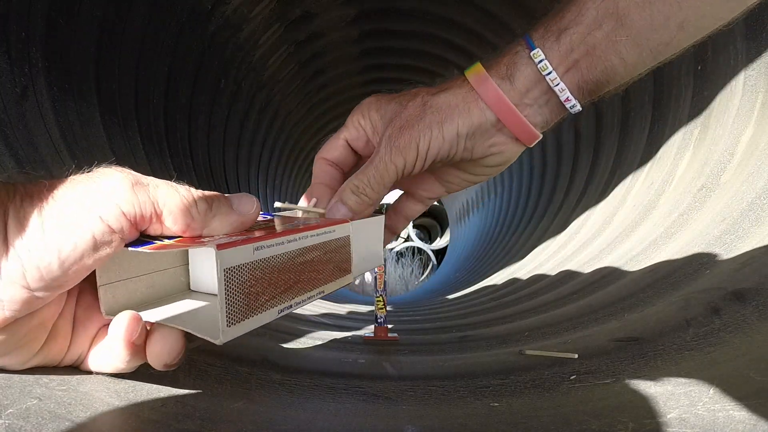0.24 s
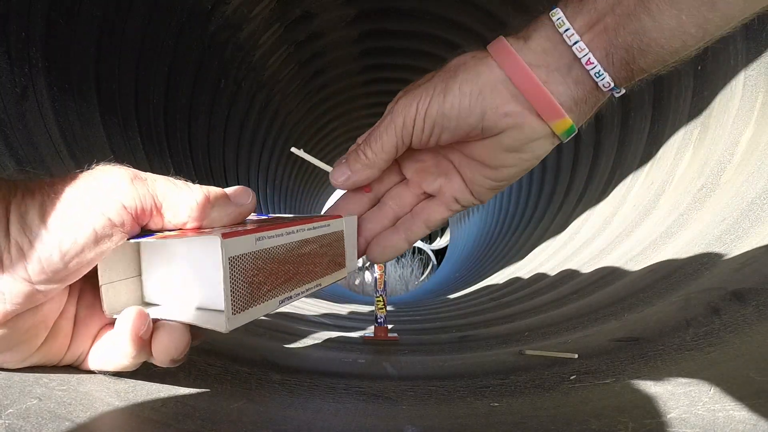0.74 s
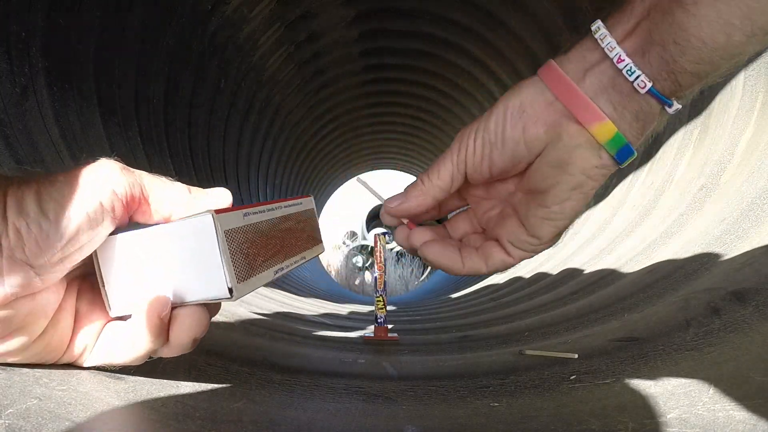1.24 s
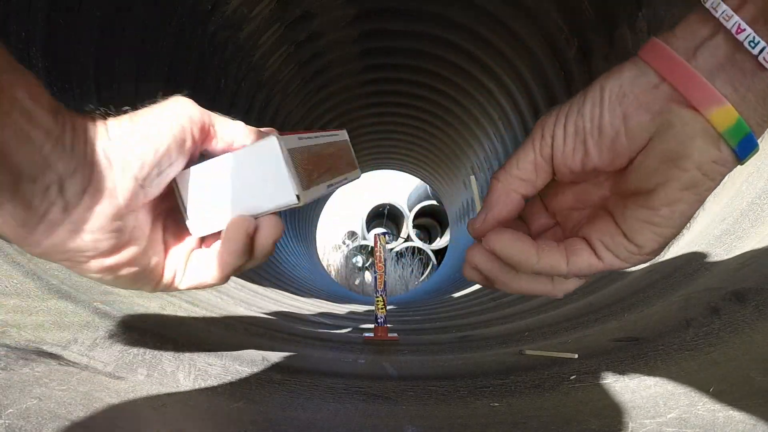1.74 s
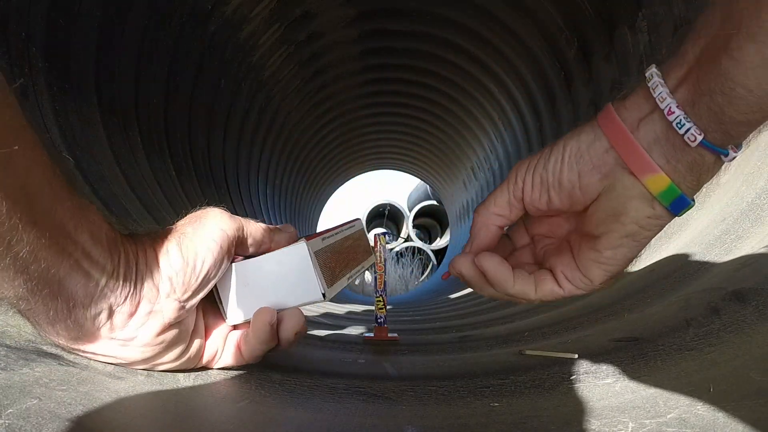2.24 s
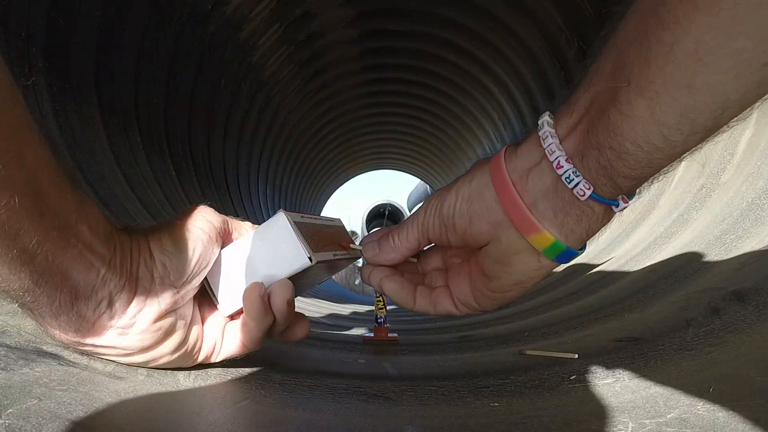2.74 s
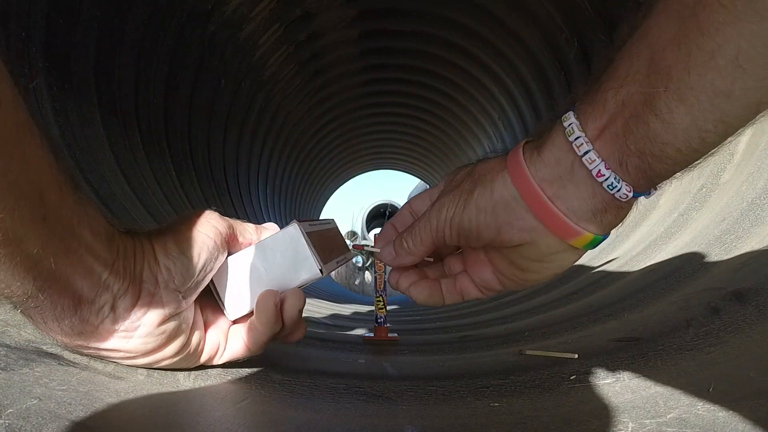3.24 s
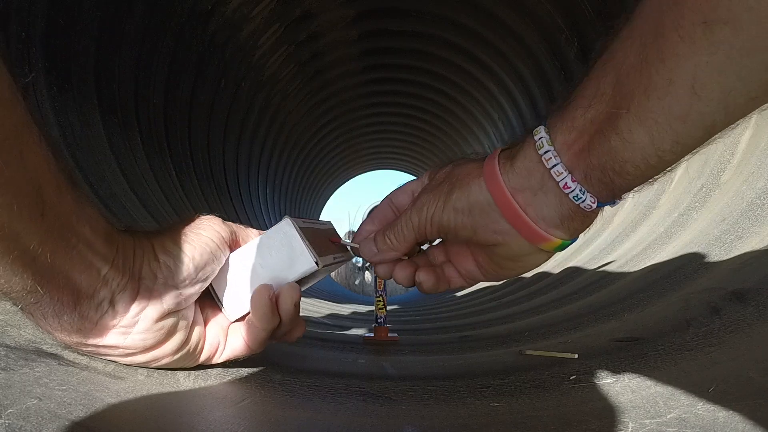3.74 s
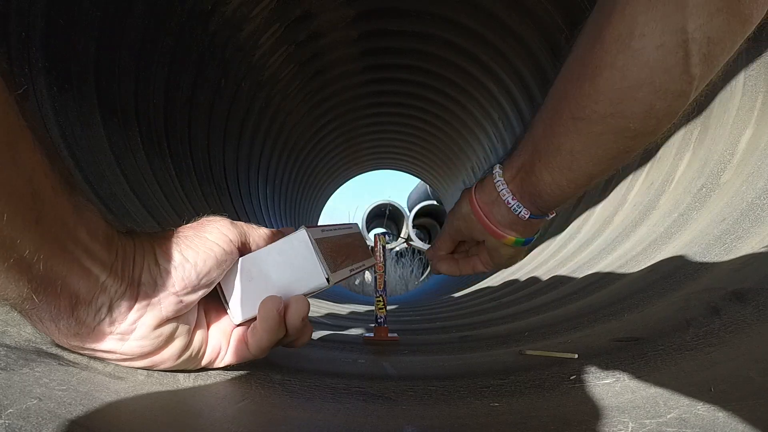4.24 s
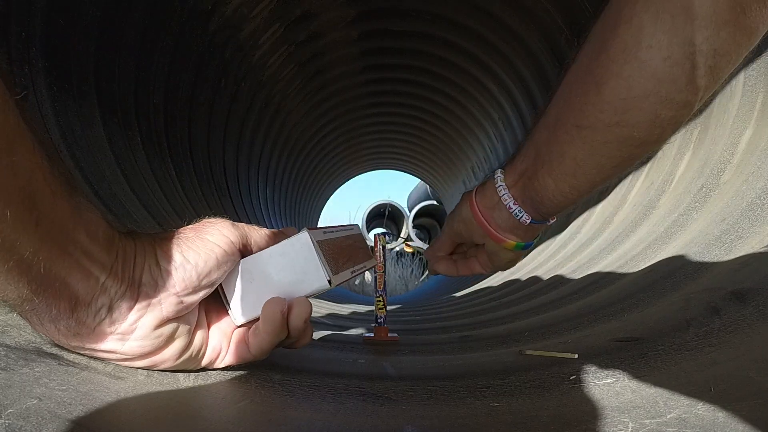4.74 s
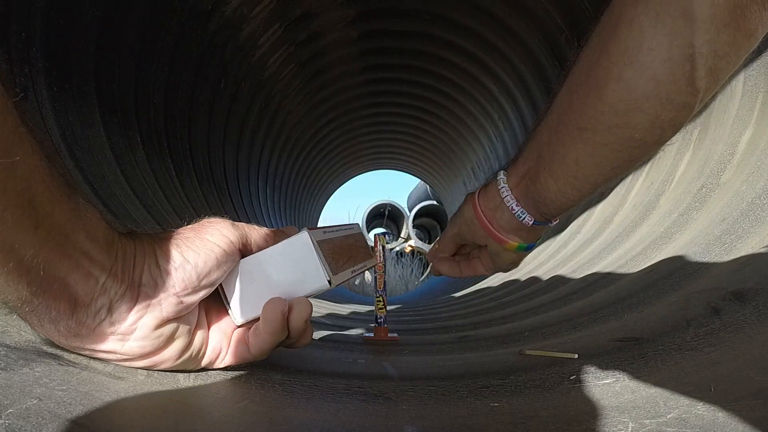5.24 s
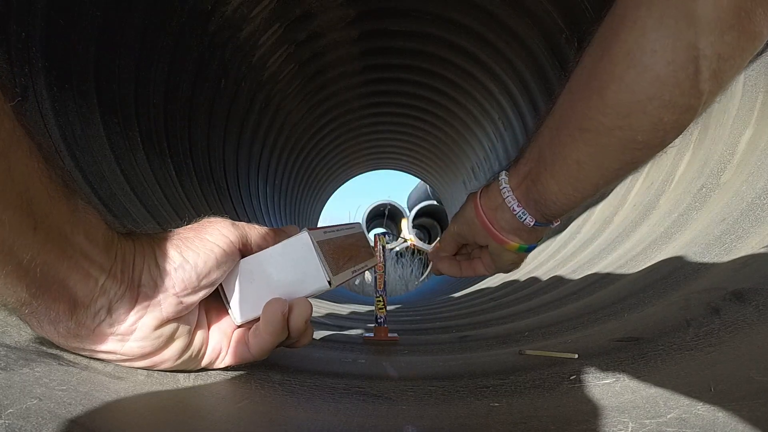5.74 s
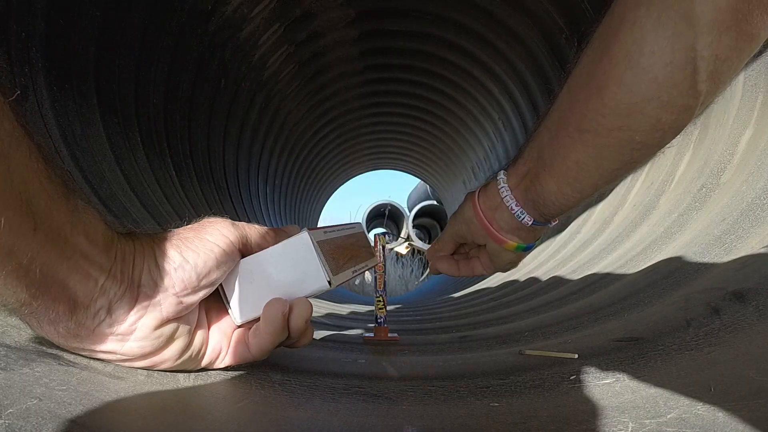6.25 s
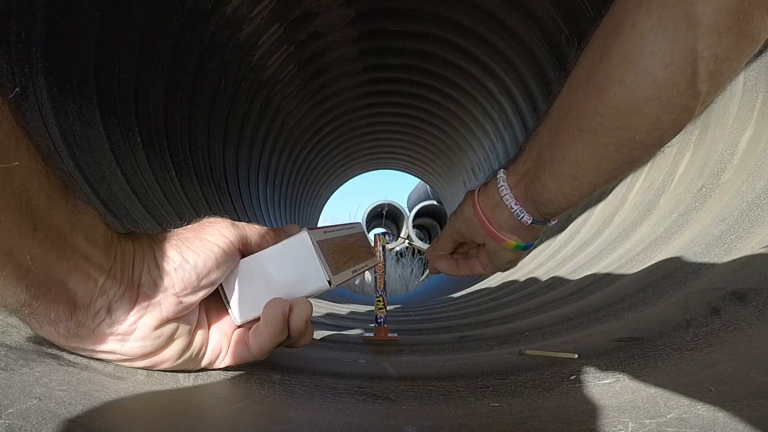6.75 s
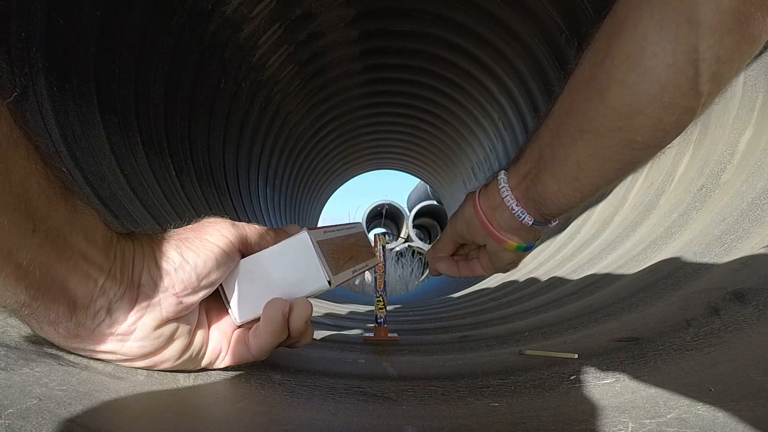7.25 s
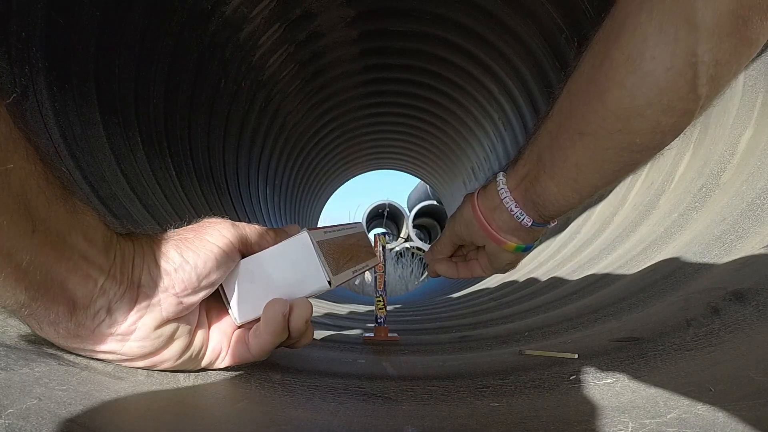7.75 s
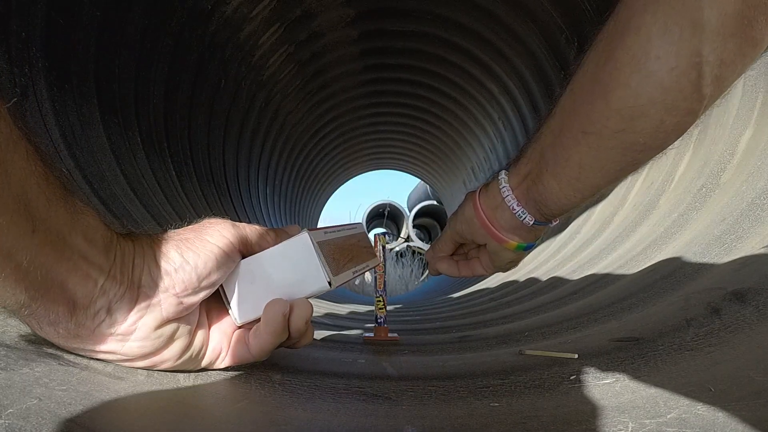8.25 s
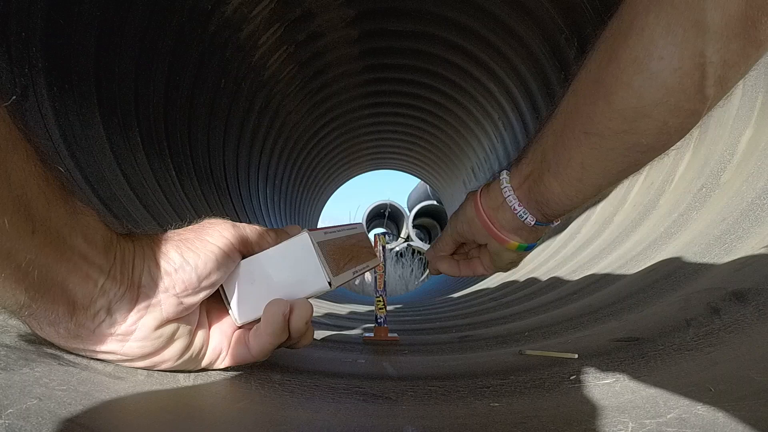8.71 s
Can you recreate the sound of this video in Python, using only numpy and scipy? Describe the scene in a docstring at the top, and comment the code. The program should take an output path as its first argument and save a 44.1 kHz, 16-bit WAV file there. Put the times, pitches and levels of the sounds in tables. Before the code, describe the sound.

A matchbox is handled and closed in an echoing plastic pipe, followed by a loud double thump and one short match scrape.

```python
"""Matches rattle softly in an open matchbox, handled inside a ribbed plastic drain pipe.
The tray rubs shut, then the arm holding the box thumps twice on the pipe wall: the wall shakes,
the air inside booms and the matches tumble. One match is scraped once over the striker and burns
with a faint hiss and flutter. The pipe echoes these small sounds and murmurs with outdoor air."""
import sys
import numpy as np
from scipy import signal
from scipy.fft import rfft, irfft, next_fast_len
from scipy.io import wavfile
from scipy.ndimage import map_coordinates

SR = 44100
rng = np.random.default_rng(int(sys.argv[2]) if len(sys.argv) > 2 else 0)


def generate_wav(signal):
    """Clip the signal to [-1, 1] and save it as 16-bit WAV at the path in sys.argv[1]."""
    frames = np.transpose(np.atleast_2d(signal))
    scaled = np.clip(frames, -1, 1) * 32767
    pcm = np.round(scaled).astype(np.int16)
    wavfile.write(sys.argv[1], SR, pcm)


N = 396018
TIME = np.arange(N) / SR
TRAY_HOME_S = 0.96  # from here on the box sounds shut
STRIKE_START_S, STRIKE_END_S = 3.988, 4.031  # the match head meets the striker and leaves it

# the box is tilted or jolted: (time [s], level [dB], rise [s], fall [s])
SHAKES = [(0.01, -53.5, 0.05, 0.26), (1.985, -57.5, 0.092, 0.05), (2.005, -40, 0.012, 0.14),
          (2.13, -39.5, 0.11, 0.048), (2.95, -63.5, 0.27, 0.3), (3.995, -51, 0.0056, 0.15),
          (4.084, -44, 0.034, 0.047), (4.175, -55.5, 0.073, 0.04)]
# a finger pushes the tray home in two goes: (time [s], length [s], level at full speed [dB])
TRAY_PUSHES = [(0.751, 0.17, -42.5), (0.993, 0.061, -44)]
# taps of wood and card, and one quick echo as the tray stops:
# (time [s], level [dB], brightness [dB], share of box ring [dB])
TAPS = [(0.181, -44, -23, -30), (0.4588, -25.5, -17, -11.5), (0.5268, -34, -24, -17),
        (0.9281, -32, -25, -9), (0.9376, -42, -26, -13), (1.043, -33, -19, -18), (1.0503, -30.5, -34, -20),
        (1.6542, -42.5, -34, -26), (1.839, -45.5, 10, -34), (2.0055, -30, -5.5, -6),
        (2.1006, -32.5, -8, -13), (2.2094, -39, -14, -8), (2.8624, -48, -23, -3), (3.0001, -44, -18, 0.5),
        (3.0165, -41.5, -21, -4), (3.0579, -50, -3, -14), (3.0962, -44.5, -20, -3), (4.106, -37, -11, -21),
        (4.1724, -41, -14, -1), (4.2906, -48.5, -20, -5)]
# sharp bursts of the scrape, the last a quick echo off the pipe wall: (time [s], level [dB])
SCRAPE_BURSTS = [(4.001, -36), (4.013, -35.5), (4.0275, -30), (4.039, -41)]
# the flame flares up: (time [s], level [dB])
FLARES = [(4.8, -75), (5.4, -69.5), (6.05, -75.5)]
# the arm lands on the pipe or jolts it: (time [s], wall level [dB], hardness [dB], boom level [dB])
THUMPS = [(1.579, -37.5, -7, -60), (1.8138, -7.5, 0, -44.5), (1.9936, -6, -3.5, -29.5),
          (2.245, -37, -13, -73), (4.002, -42, 6, -49.5)]
# the box knocks as the arm lands: (time [s], level [dB], contact time [s], ring of its side [dB])
KNOCKS = [(1.812, -28, 0.00081, 16.5), (1.9885, -21.5, 0.0011, 0), (1.9907, -21.5, 0.0014, 5)]
# puffs of breeze at the pipe's mouth: (time [s], level [dB])
GUSTS = [(0.3, -54), (1.65, -50.5), (2.7, -57), (4.5, -60), (6.55, -55), (8.1, -59.5)]

# The tone of each sound, from low to high pitch: (frequency [Hz], level [dB])
TUMBLE_TONE = [(500, -22), (700, -3.5), (950, -11.5), (1400, -3), (2400, 2), (3200, -7.5), (4300, -13.5),
               (5500, -6.5), (7000, -15), (9000, -29.5), (15000, -39)]  # sticks in the shut box
PICK_TONE = [(500, -21), (1000, -14), (1200, 2.5), (1650, -2), (1900, -9), (2300, -4), (4000, -15),
             (6000, -17), (15000, -42)]  # sticks in the open tray
SLIDE_TONE = [(200, -24), (300, -3), (500, -38), (900, -10), (1450, -4), (2000, -10.5), (2650, -12),
              (3200, -7.5), (4200, -16), (6000, -7), (8500, -17), (12000, -25), (15000, -26)]  # card rubbing on card
RASP_TONE = [(300, -25), (900, -18), (1550, 4.5), (2800, -4.5), (6500, 2), (9000, -11), (15000, -20.5)]
TAP_TONE = [(200, -20), (900, -11.5), (1250, -0.5), (2250, 1.5), (3400, -12.5), (4600, -2), (6000, -0.5),
            (8500, -19), (15000, -33.5)]
GRIT_TONE = [(100, -1), (230, 8), (480, -10), (720, 0.5), (1150, -5), (2000, -2), (3000, -2.5),
             (4200, -5.5), (5200, -2), (7500, -9.5), (10000, -13.5), (13000, -18), (15000, -26)]  # the rough striker
FIZZ_TONE = [(500, -20), (2500, 4), (5500, 4.5), (8000, -7.5), (15000, -27)]
FLUTTER_TONE = [(60, -16), (150, 3), (320, 2), (600, -15), (1500, -19), (6000, -45)]
WALL_TONE = [(40, -39.5), (100, -9), (140, -20), (165, 1.5), (215, 0.5), (245, -2.5), (280, 0.5),
             (350, -3.5), (400, -15), (480, -30.5), (560, -21), (730, -21), (820, -36.5), (1200, -49),
             (3000, -73)]
SHUDDER_TONE = [(15, -2.5), (30, 6.5), (50, 7), (70, -11), (98, -6), (130, -18), (220, -12), (330, -21),
                (500, -61.5)]  # the whole pipe shaking
KNOCK_TONE = [(200, -7), (650, -1), (1000, -9), (1500, 4.5), (1900, -1.5), (2600, -8), (3200, -38),
              (6000, -29), (15000, -55)]
AIR_TONE = [(11, -38), (18, -6.5), (37, -5.5), (54, -12), (76, -6.5), (129, -10), (171, -9), (309, -12.5),
            (387, -15), (827, -18.5), (1060, -20.5), (3100, -26.5), (9040, -39), (13400, -43.5),
            (15000, -50)]
BREEZE_TONE = [(10, -4.5), (30, 1), (60, -10), (150, -17), (400, -29.5), (1500, -66)]

# Rings are the pitches that a thing makes louder: (frequency [Hz], width [Hz], boost [dB])
OPEN_BOX_RINGS = [(1200, 100, -1), (1615, 280, 11.5), (2240, 150, 9), (3620, 350, 15.5), (5030, 180, 7),
                  (5970, 450, 5.5)]
SHUT_BOX_RINGS = [(1374, 140, 6.3), (1630, 130, 2.5), (1970, 61, 2), (2235, 100, 6.6), (2990, 140, 6.3),
                  (3660, 190, 13), (5060, 210, 9.7), (5810, 160, 4.4)]
MATCH_RING, FLAME_RING = (2900, 1100, 2.8), (2600, 1200, 4)
WALL_RINGS = [(168, 16, 0), (203, 7.1, 5.5), (276.6, 29, 3.5), (355.3, 5.9, 3), (413, 15, 7.5),
              (576, 16, 6), (710, 54, 6.5)]
PIPE_AIR_RINGS = [(360, 40, 12), (696, 44, 2.5)]  # air ringing across the pipe

# how long the pipe's echo takes to fade by 60 dB (a "t60"): (frequency [Hz], fade time [s])
PIPE_FADE = [(200, 0.73), (900, 1), (2200, 0.54), (5500, 0.26), (12000, 0.31)]


def match_rattle(settle_db=-23, settle_s=0.63):
    """Each shake makes the sticks rub, then settle: first in the open tray, later in the shut box."""
    stirring = together(swell(s, db, rise, fall) + swell(s, db + settle_db, rise, settle_s)
                        for s, db, rise, fall in SHAKES)
    slips = friction(per_second=870, spread_db=5, smooth=0.62)
    picked = unit(shape_tone(slips, PICK_TONE))
    tumbling = unit(shape_tone(slips, TUMBLE_TONE, SHUT_BOX_RINGS))
    return stirring * np.where(TIME < TRAY_HOME_S, picked, tumbling)


def tray_slide(rasp_db=-1, ring_share=0.76, speed_up_s=0.09, dull_hz=1900):
    """Card fibres catch as the tray slides: dull at first, hollow at speed, a thin rasp near home."""
    slips = friction(per_second=2500, spread_db=0, smooth=0.77)
    fast = unit(shape_tone(slips, SLIDE_TONE, OPEN_BOX_RINGS))
    slow = signal.sosfiltfilt(signal.butter(2, dull_hz, fs=SR, output="sos"), fast)
    speed = np.clip((TIME - TRAY_PUSHES[0][0]) / speed_up_s, 0, 1)
    hollow = slow + speed * (fast - slow)
    weaker_rings = [(hz, width, ring_share * db) for hz, width, db in OPEN_BOX_RINGS]
    rasp = amp(rasp_db) * unit(shape_tone(slips, RASP_TONE, weaker_rings))
    return finger_push() * np.where(TIME < TRAY_HOME_S, hollow, rasp)


def finger_push(drag=0.5, jerk=1.1, jerk_s=0.0049, build_s=0.0084):
    """How hard the tray rubs: each push speeds up and slows down; the first starts with a jerk."""
    force = np.zeros(N)
    for k, (s, length, db) in enumerate(TRAY_PUSHES):
        t = np.arange(int(length * SR)) / SR
        speed = np.sin(np.pi * t / length) ** 2
        grip = drag + jerk * np.exp(-t / jerk_s) if k == 0 else drag * (1 - np.exp(-t / build_s))
        add(force, s, amp(db) * (grip + (1 - drag) * speed))
    return force


def box_taps(gain_db=-1, tap_t60=0.02, ring_hz=2310, ring_t60=0.038, ring_gain_db=2):
    """Sticks and tray tap the card, with one quick echo; hard taps are bright, soft ones mostly ring."""
    out, t = np.zeros(N), np.arange(SR // 10) / SR
    for s, db, bright_db, ring_db in TAPS:
        treble_db = 0.81 * (bright_db + 8)  # a brightness of -8 leaves the tone as it is
        tone = [(hz, level + treble_db * (hz > 4000)) for hz, level in TAP_TONE]
        tap = shape_tone(rng.standard_normal(len(t)) * amp(-60 * t / tap_t60), tone)
        pitch_hz = ring_hz * (1 + rng.normal(0, 0.018))
        ring = amp(ring_db + ring_gain_db - 60 * t / ring_t60) * np.sin(2 * np.pi * pitch_hz * t)
        add(out, s, amp(db + gain_db) * (tap / np.abs(tap).max() + ring))
    return out


def match_strike(level_db=-39, press_db_per_s=268, release_db_per_s=900, burst_t60=0.025):
    """The head scrapes ever harder over the grit in bursts, then flies off; a quick echo follows."""
    time_left = STRIKE_END_S - TIME
    below_peak_db = np.maximum(press_db_per_s * time_left, -release_db_per_s * time_left)
    force = (TIME > STRIKE_START_S) * amp(level_db - np.minimum(below_peak_db, 200))
    t = np.arange(SR // 20) / SR
    for s, db in SCRAPE_BURSTS:
        add(force, s, amp(db - 60 * t / burst_t60))
    slips = friction(per_second=4600, spread_db=1.5, smooth=0.41)
    rings = SHUT_BOX_RINGS + [MATCH_RING]
    return shape_tone(force * slips, GRIT_TONE, rings) / np.std(shape_tone(slips, GRIT_TONE, rings))


def flame(fizz_db=-76.5, fade_db_per_s=1.5, flicker_db=1, flutter_db=5, flutter_lag_s=0.17):
    """The lit head fizzes softly and burns down; a low flutter follows each flare-up."""
    age = TIME - STRIKE_END_S
    flares = [swell(s, db, rise_s=0.37, fall_s=0.7) for s, db in FLARES]
    burn = together([amp(fizz_db - fade_db_per_s * age)] + flares) * (age > 0)
    late_burn = np.interp(TIME - flutter_lag_s, TIME, burn)
    flicker = amp(flicker_db * wobble(per_second=12))
    crackle = friction(per_second=1700, spread_db=7, smooth=0.67)
    fizz = unit(shape_tone(crackle, FIZZ_TONE, [FLAME_RING]))
    flutter = amp(flutter_db) * noise(FLUTTER_TONE)
    return flicker * (burn * fizz + late_burn * flutter)


def arm_thumps(ripple_db=-9, ripple_t60=0.19, rise_s=0.0035, boom_hz=70, boom_t60=1.55,
               shudder_db=-2, shudder_t60=1.24):
    """Each blow dents the wall, sends ripples bouncing off its ribs and makes the air inside boom."""
    out, t = np.zeros(N), np.arange(2 * SR) / SR
    for s, wall_db, hard_db, boom_db in THUMPS:
        rise = 1 - np.exp(-t / rise_s)
        ripples = rng.standard_normal(len(t)) * rise * amp(-60 * t / ripple_t60)
        force = (t == 0) + amp(ripple_db) * ripples / np.linalg.norm(ripples)  # one push, then ripples
        tone = [(hz, db + hard_db * (hz > 380)) for hz, db in WALL_TONE]
        wall = shape_tone(force, tone, WALL_RINGS)
        boom = amp(-60 * t / boom_t60) * np.sin(2 * np.pi * boom_hz * t)
        shudder = amp(shudder_db - 60 * t / shudder_t60) * noise(SHUDDER_TONE, len(t))
        add(out, s, rise * amp(boom_db) * (boom + shudder) - amp(wall_db) * wall / np.abs(wall).max())
    return out


def box_knocks(ring_hz=2340, ring_width_hz=350):
    """A short, dull knock passes through the held box, and a free side of it rings."""
    out, t = np.zeros(N), np.arange(SR // 20) / SR
    for s, db, contact_s, ring_db in KNOCKS:
        contact = rng.standard_normal(len(t)) * t / contact_s * np.exp(-t / contact_s)
        knock = shape_tone(contact, KNOCK_TONE, [(ring_hz, ring_width_hz, ring_db)])
        add(out, s, amp(db) * knock / np.abs(knock).max())
    return out


def pipe_echo(sound, bounces=5, gap_s=0.0108, echo_db=-9, loss_db=6, smear_t60=0.0058, tail_db=-9):
    """The round wall sends back a quick row of blurred echoes that melts into a smooth tail."""
    hz, times, bands = signal.stft(rng.standard_normal(SR // 2), SR, nperseg=256)
    fade = amp(-60 * times / read_curve(PIPE_FADE, hz)[:, None])
    tail = signal.istft(bands * fade, SR, nperseg=256)[1]
    tail = shape_tone(tail, [(1000, 0)], PIPE_AIR_RINGS)  # a flat tone, plus the rings
    response, t = np.zeros(N), np.arange(SR // 50) / SR
    add(response, 0.003, amp(tail_db) * tail / np.linalg.norm(tail))
    for k in range(bounces):
        echo = rng.standard_normal(len(t)) * amp(-60 * t / smear_t60)
        add(response, (k + 1) * gap_s, amp(echo_db - k * loss_db) * echo / np.linalg.norm(echo))
    return signal.fftconvolve(sound, response[:SR])[:N]


def outdoor_air(murmur_db=-57, lull_db=-66):
    """Outdoor air murmurs and hisses in the pipe; a light breeze rumbles at its mouth in puffs."""
    murmur = amp(murmur_db) * noise(AIR_TONE)
    puffs = [swell(s, db, rise_s=0.4, fall_s=1.7) for s, db in GUSTS]
    return murmur + noise(BREEZE_TONE) * together([amp(lull_db)] + puffs)


def friction(per_second, spread_db, smooth):
    """Tiny clicks at random times, like surfaces slipping, over a share of smooth hiss."""
    clicks = (rng.random(N) < per_second / SR) * rng.choice([-1, 1], N)
    sizes = amp(spread_db * np.clip(rng.standard_normal(N), -2, 2))
    return unit(clicks * sizes) + smooth * rng.standard_normal(N)


def noise(tone, length=N):
    """Steady noise with the given tone."""
    return unit(shape_tone(rng.standard_normal(length), tone))


def shape_tone(sound, tone, rings=(), size=16384):
    """Filter a sound so that it follows a tone curve, with a boost at each ring."""
    hz = np.fft.rfftfreq(size, 1 / SR)
    boost_db = sum(db / (1 + (2 * (hz - centre) / width) ** 2) for centre, width, db in rings)
    cepstrum = irfft(np.log(amp(read_curve(tone, hz) + boost_db)))
    # folding this in half makes the filter ring after a hit, never before it
    cepstrum[1:size // 2] *= 2
    cepstrum[size // 2 + 1:] = 0
    response = irfft(np.exp(rfft(cepstrum)))
    return signal.fftconvolve(sound, response)[:len(sound)]


def swell(s, db, rise_s, fall_s):
    """A gain that climbs its last 20 dB in rise_s, peaks at time s, then drops 20 dB every fall_s."""
    before, after = np.maximum(s - TIME, 0), np.maximum(TIME - s, 0)
    return amp(np.maximum(db - 20 * ((before / rise_s) ** 2 + after / fall_s), -200))


def wobble(per_second):
    """A smooth curve through random points."""
    points = rng.standard_normal(int(N * per_second / SR) + 4)
    return map_coordinates(points, [TIME * per_second])


def read_curve(points, hz):
    """Read between (frequency, value) points on a log frequency scale."""
    frequencies, values = np.transpose(points)
    return np.interp(np.log(hz + 1), np.log(frequencies + 1), values)


def together(gains):
    """Combine the gains of unrelated sounds: their powers add up."""
    return np.sqrt(sum(gain ** 2 for gain in gains))


def add(track, s, sound):
    """Mix a sound into the track at s seconds."""
    start = max(round(s * SR), 0)
    track[start:start + len(sound)] += sound[:N - start]


def amp(db):
    """Turn decibels into a gain."""
    return 10 ** (np.asarray(db) / 20)


def unit(sound):
    """Scale a sound to an average (rms) level of 1."""
    return sound / np.sqrt(np.mean(sound ** 2) + 1e-20)


def scene(handling_db=-0.5, knock_echo_db=-12):
    """Mix the box and match with their echo, the thumps and the air, in one channel."""
    handling = amp(handling_db) * (box_taps() + tray_slide() + match_rattle() + match_strike() + flame())
    knocks = box_knocks()
    echo = pipe_echo(handling + amp(knock_echo_db) * knocks)
    return (handling + knocks + echo + arm_thumps() + outdoor_air())[None]


def record(dry, top_hz=15250):
    """Cut away the very highest treble."""
    size = next_fast_len(N + SR)
    kept = np.fft.rfftfreq(size, 1 / SR) < top_hz
    return irfft(rfft(dry, size) * kept, size)[:, :N]


dry = scene()
out = record(dry)
generate_wav(out)
```